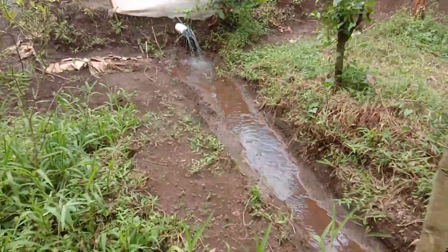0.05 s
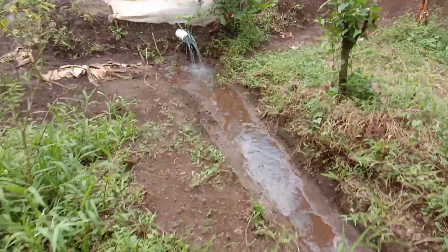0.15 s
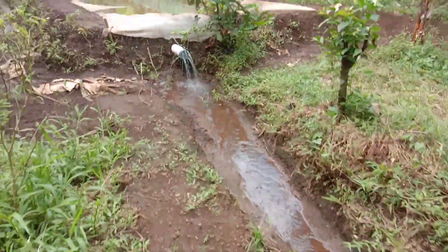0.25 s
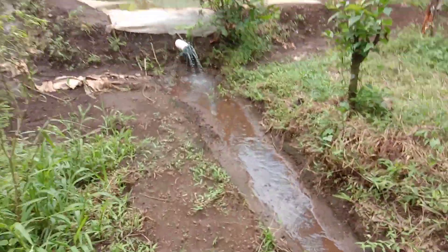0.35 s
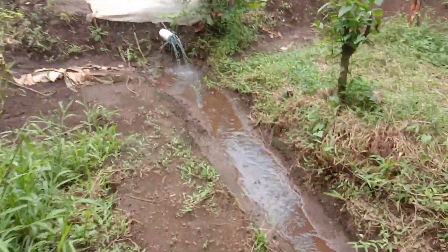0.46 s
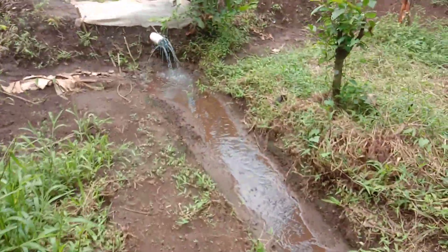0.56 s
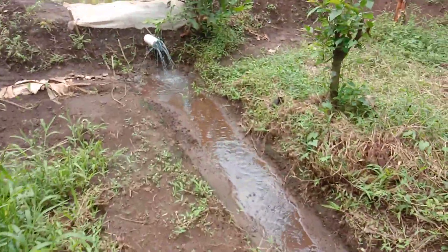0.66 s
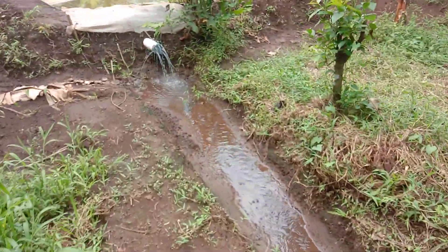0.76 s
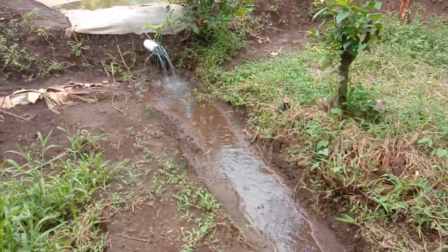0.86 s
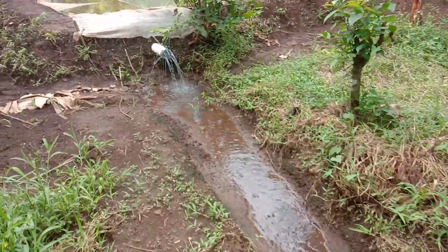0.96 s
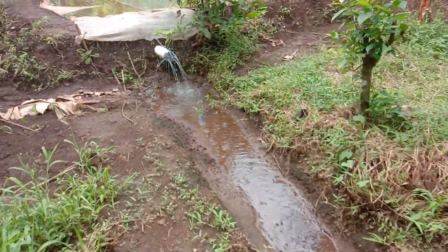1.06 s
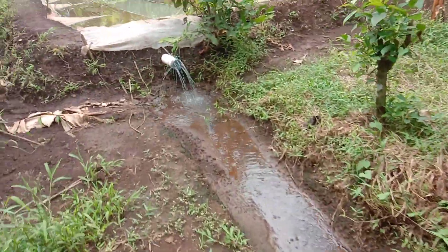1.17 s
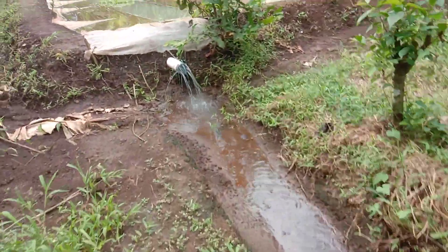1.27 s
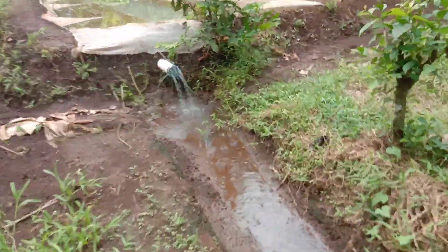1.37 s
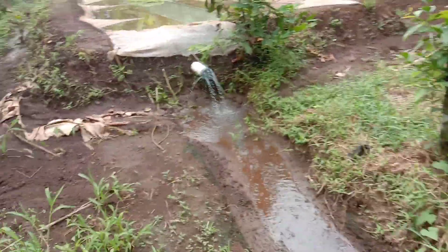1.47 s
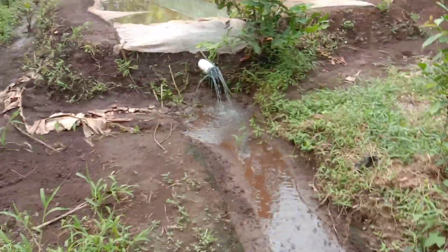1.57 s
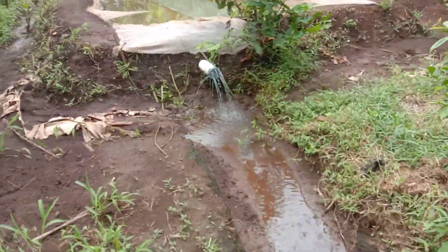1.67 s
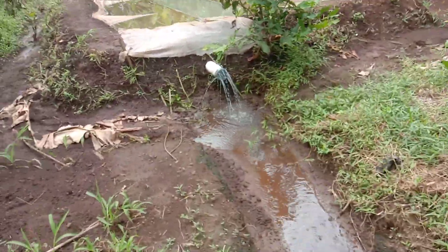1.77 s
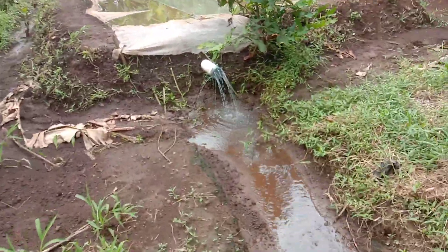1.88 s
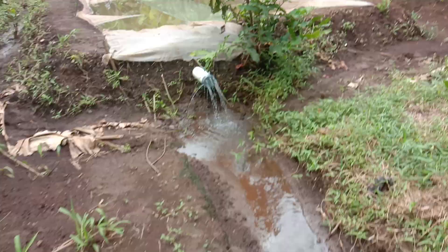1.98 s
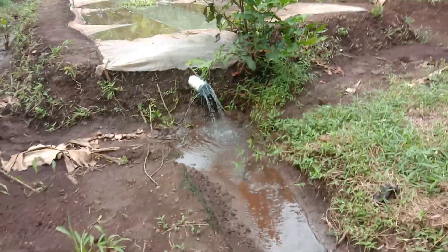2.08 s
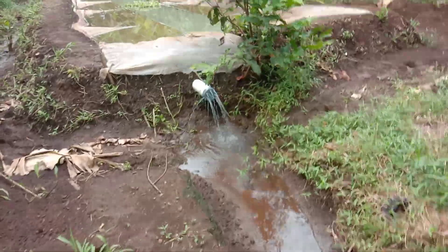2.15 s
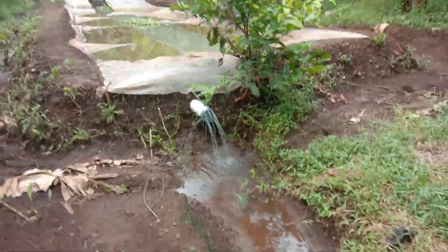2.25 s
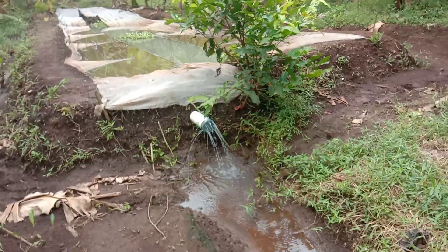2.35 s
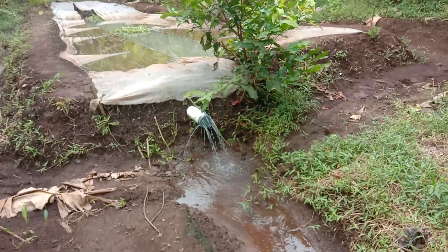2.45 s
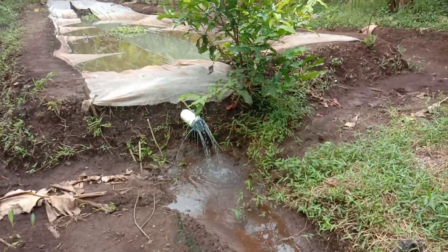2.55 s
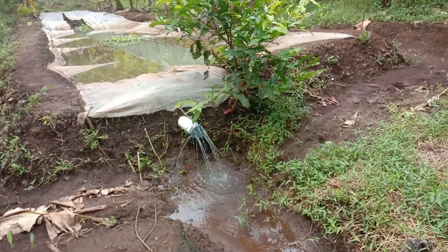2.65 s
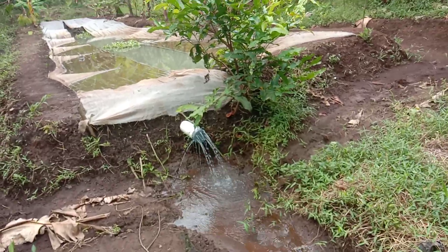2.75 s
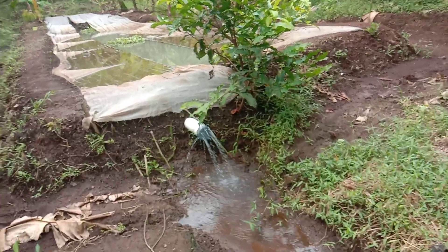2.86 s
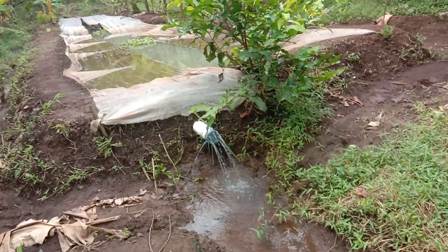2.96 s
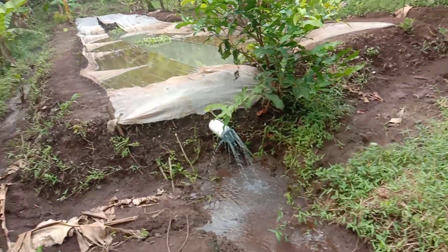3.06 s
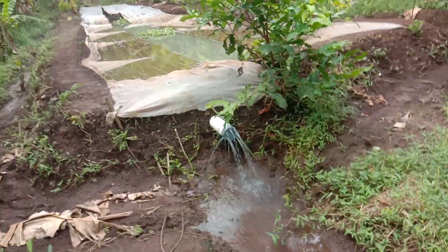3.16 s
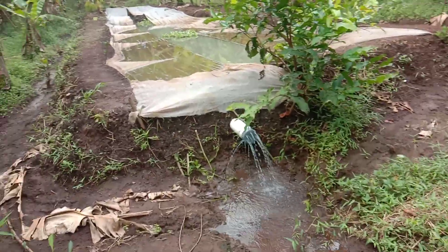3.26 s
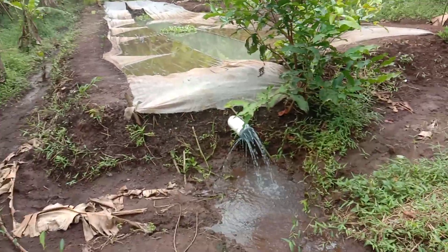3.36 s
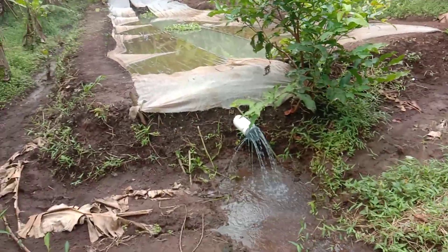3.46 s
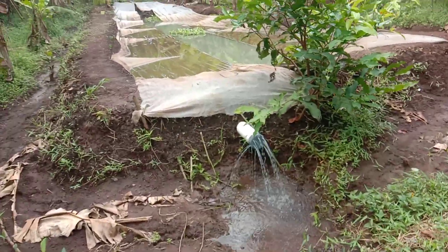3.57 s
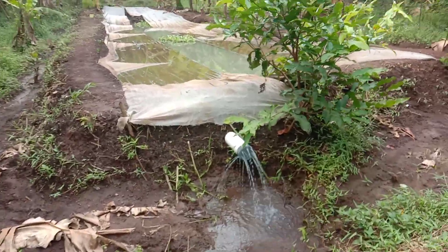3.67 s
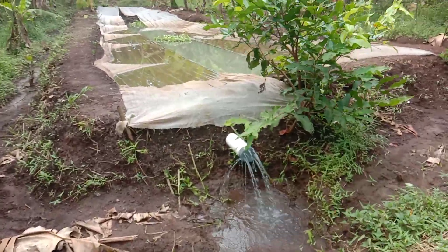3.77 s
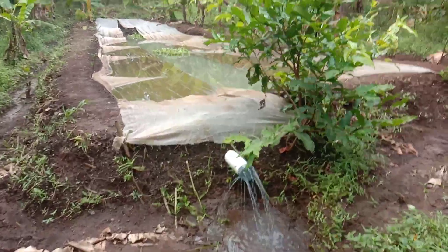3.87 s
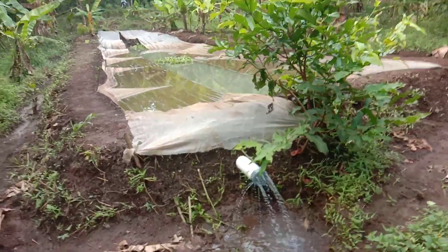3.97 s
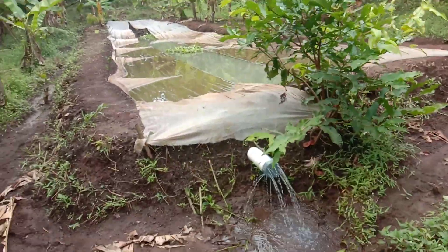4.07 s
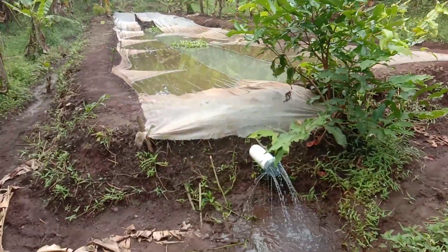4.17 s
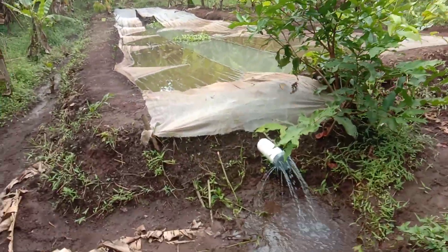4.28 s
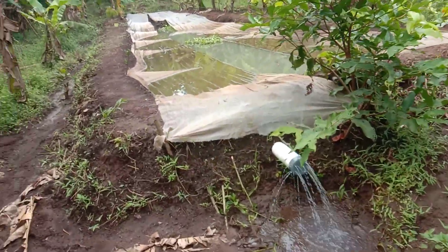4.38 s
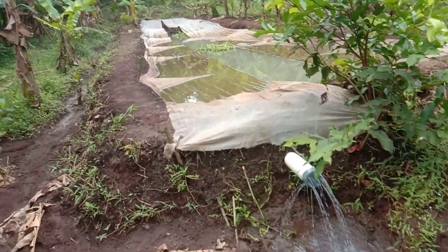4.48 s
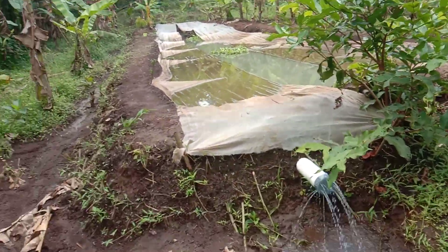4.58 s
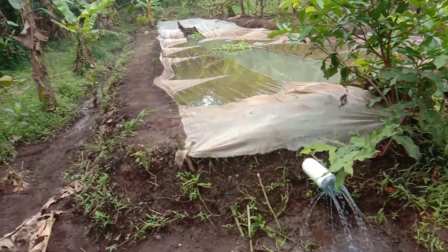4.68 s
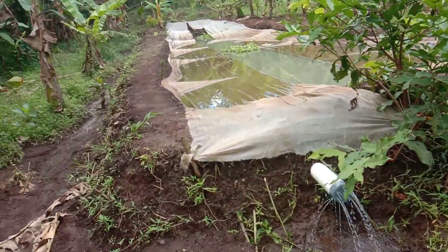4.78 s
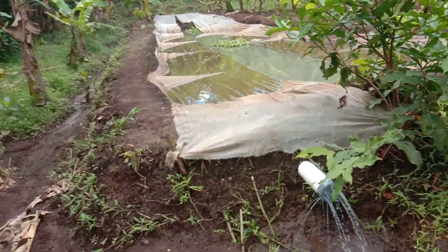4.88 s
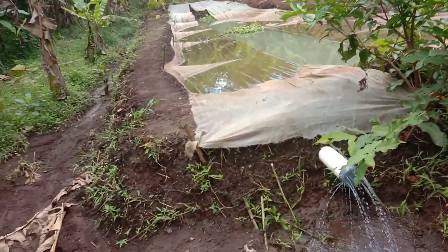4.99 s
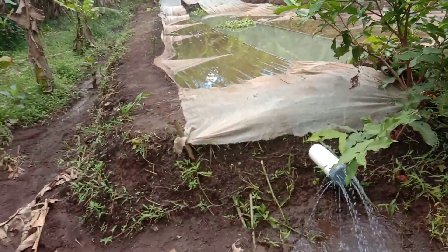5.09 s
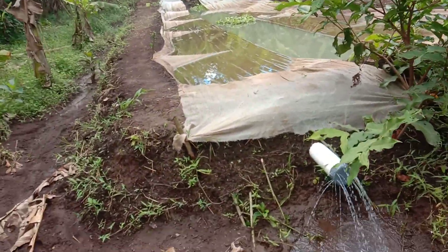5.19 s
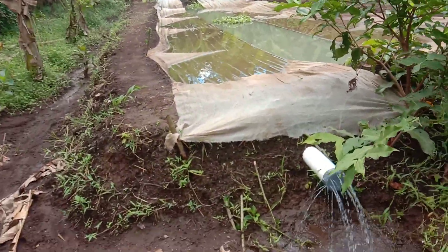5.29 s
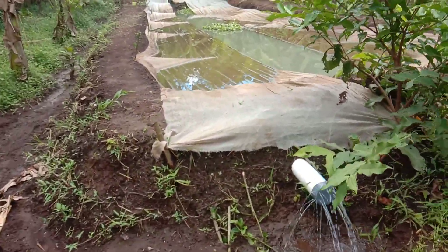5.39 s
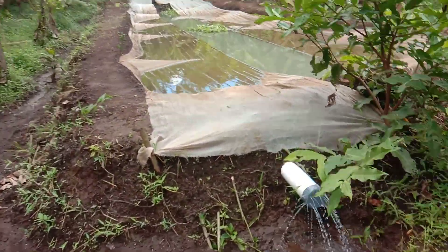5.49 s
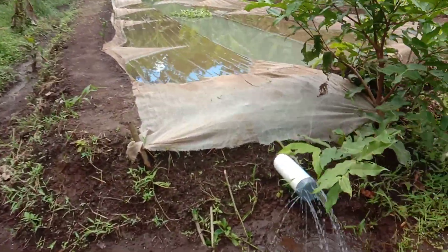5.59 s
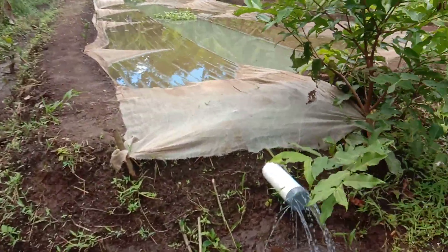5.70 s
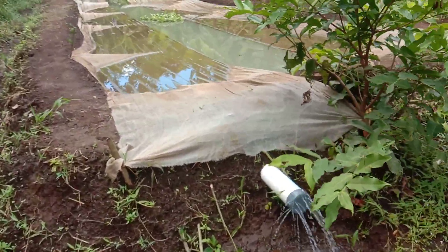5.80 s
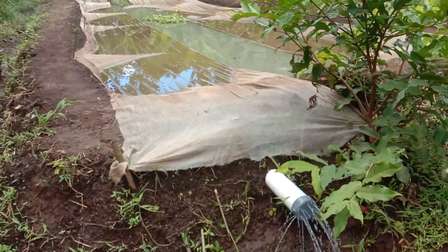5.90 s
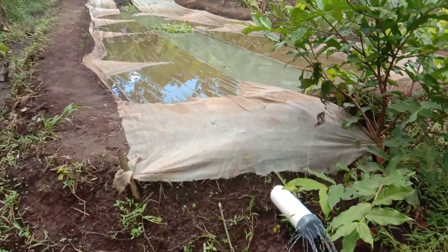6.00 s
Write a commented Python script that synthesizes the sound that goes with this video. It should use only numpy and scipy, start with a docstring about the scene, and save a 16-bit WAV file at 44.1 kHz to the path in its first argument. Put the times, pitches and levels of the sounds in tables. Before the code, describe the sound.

Water pours steadily from a plastic pipe into a muddy puddle, splashing and plinking louder as the listener walks closer, engines droning faintly far off.

```python
"""A broad wash of noise opens, swelling quickly and ebbing, as water pours from a plastic pipe into a muddy puddle.
Clumped drops patter, bubbles and the pipe's mouth ring, and two small engines drone far off over a rumble.
Plops stand out from the start, and then slaps and gushes; the engines speed up and slacken.
As the microphone walks up, the splashing grows as 1 / distance and the plinks ring clearer; later, dull thuds join.
Water is random impacts, filtered noise and decaying bubble tones; engines are harmonic sums."""
import sys
import numpy as np
from scipy import signal
from scipy.fft import rfft, irfft, next_fast_len
from scipy.io import wavfile
from scipy.ndimage import map_coordinates

SR = 44100
rng = np.random.default_rng(int(sys.argv[2]) if len(sys.argv) > 2 else 0)


def wav_record(signal):
    """Record a signal, one row per channel, as 16-bit PCM in the file named by sys.argv[1]."""
    frames = np.transpose(np.atleast_2d(signal))
    bounded = np.clip(frames, -1, 1)
    # unit amplitude maps onto the largest positive 16-bit level
    quanta = np.round(bounded * 32767).astype(np.int16)
    wavfile.write(sys.argv[1], SR, quanta)


N = 266099  # length in samples

# The walk up to the puddle: start_s, distance_m
APPROACH = [(0, 2.45), (.6, 2.8), (2, 2.5), (3.3, 2.34), (4.2, 1.89), (5.6, 1.4), (6.03, 1.55)]
# Rises and dips of the pipe's flow: start_s, lift_db, length_s
GUSHES = [(1.632, 9, 0.046), (1.837, 4.5, 0.16), (3.49, 2.5, 0.32), (3.785, 3.5, 0.13), (4.85, -1, 0.13),
          (5.867, 0.5, 0.059)]
GUSH_RISE = 0.17  # share of its length that a gush takes to build up
SPATTER_DB = -35  # reference at 1 m, before gushes and each layer's own gain
# Spectrum of the spatter: frequency_hz, gain_db
SPATTER = [(150, -9.5), (450, -11.5), (750, -12.5), (1000, 1), (1250, -5), (1600, -3), (2800, 4.5),
           (3600, 0.5), (4400, 3.5), (5200, 0), (7400, 0), (8300, -7), (11000, -12.5), (15200, -9)]
# Spectrum of the fine spray: frequency_hz, gain_db
SPRAY = [(3000, -14.5), (7000, 4.5), (9000, -2), (11500, 4.5), (13600, -9), (15200, -7.5)]
# Fine spray, and trickle of like-sized bubbles before a fixed cut: start_s, spray_db, trickle_db
MIST = [(0, -17, -26), (.7, -9.5, -35), (2.8, -12, -0.5), (3.6, -11, -1), (4.5, -10.5, -3), (5.5, -13.5, 0),
        (6.03, -5, 1.5)]
# Fixed resonances that colour the splashing: centre_hz, width_hz, lift_db
RESONANCES = [(1255, 115, 5.5), (2330, 330, 2), (5950, 450, 3.5), (6300, 300, 6.5), (6570, 220, -5),
              (7250, 700, 4.5), (13850, 600, -4), (14700, 700, 11), (15350, 650, 10)]
# Gurgle of air dragged under by the jet: start_s, level_db
CHURN = [(0, -60.5), (.45, -50), (.68, -55.5), (.8, -62), (.98, -53.5), (1.1, -53), (1.6, -53.5),
         (2.3, -50), (2.9, -52.5), (3.5, -50), (3.85, -49.5), (3.95, -56), (4.3, -52.5), (5.3, -47.5),
         (6.03, -51.5)]
GLUG_DB = -10.5  # against the gurgle
# Hollow resonances of the pipe's mouth: centre_hz, width_hz, level_db
PIPE_MODES = [(1244, 53, 0), (1296, 61, 0.5)]
# Level of the pipe's ring: start_s, level_db
PIPE_DB = [(0, -59), (.5, -49), (.8, -55.5), (1.3, -55.5), (2.6, -53), (3.7, -55.5), (4.4, -53.5),
           (6.03, -48.5)]
PLINK_DB = -3  # against the splashing reference at 1 m
PLINK_GROWTH_DB = 3.5  # gained on the splashing with each halving of the distance
# The opening wash: start, level, swell and ebb
WASH_S, WASH_DB, WASH_RISE_S, WASH_T60_S = 0.033, -36.5, 0.062, 1.42
# Spectrum of the opening wash: frequency_hz, gain_db
WASH = [(200, -32), (400, -8.5), (700, 2), (1000, -9), (1400, 2), (2200, 1), (4200, 4.5), (6500, 3.5),
        (8500, -13), (12000, -4), (15000, -10)]
# Lumps of water: start_s, starting_db, t60_s, centre_hz
SPLASHES = [(1.162, -36.5, 0.18, 1800), (1.168, -45, 0.6, 3640), (3.058, -49, 0.12, 1600),
            (3.608, -41, 0.16, 3820), (4.503, -25.5, 0.043, 5050), (4.81, -43, 0.38, 2350),
            (4.899, -43, 0.17, 2620), (4.924, -38, 0.077, 3350), (5.152, -29.5, 0.048, 5700),
            (5.889, -45, 0.27, 2600)]
# Large bubbles, before their tail: start_s, ring_peak_db, pitch_hz, splash_against_ring_db
PLOPS = [(.005, -44.5, 796, -11), (0.058, -35, 1890, 0), (.108, -31, 4100, 0), (.12, -38.5, 1430, -4),
         (0.194, -38, 1120, 3), (0.319, -41, 1270, -1), (0.982, -32, 2120, -10), (1.079, -42, 1015, 2),
         (1.162, -27, 1357, -11), (1.19, -31.5, 2040, -6), (1.24, -37, 1260, -10), (1.254, -31.5, 3530, -6),
         (1.377, -29, 2860, -3), (1.385, -40.5, 1030, 1), (1.41, -39.5, 857, -5), (1.486, -37.5, 1260, -17),
         (1.788, -33.5, 2760, 1), (1.807, -32, 2980, 1), (2.335, -34.5, 1230, -17),
         (2.396, -33.5, 3300, -5), (2.72, -34.5, 2600, 2), (2.757, -36, 2500, -14), (2.828, -33, 2490, -12),
         (2.883, -29, 2430, -7), (2.974, -27.5, 2420, -11), (3.06, -33.5, 1340, -1), (3.14, -28, 3600, -4),
         (3.172, -31.5, 3270, -1), (3.241, -34, 4040, 2), (3.319, -31.5, 2300, -6), (3.383, -37, 1020, 1),
         (3.441, -25, 2140, -12), (3.448, -31, 1950, -12), (3.521, -32, 2510, -14), (3.527, -34, 1280, -14),
         (3.538, -30.5, 2310, -6), (3.61, -31, 1830, -6), (3.616, -29.5, 2430, -6), (3.865, -32, 2340, -11),
         (4.039, -27, 2690, -28), (4.042, -34, 1140, -3), (4.115, -34.5, 1260, -17),
         (4.224, -35, 2430, -15), (4.245, -27.5, 2320, -11), (4.288, -32.5, 2290, -8),
         (4.366, -32.5, 2390, -2), (4.376, -34, 1230, -10), (4.473, -30, 2460, -14),
         (4.629, -30.5, 4300, 6), (4.825, -32.5, 1250, -20), (4.835, -33.5, 2220, 1.5),
         (4.864, -41, 1480, 3), (4.885, -25, 2250, -18), (4.907, -31, 2270, -8), (4.927, -25.5, 2350, -1),
         (4.934, -34, 2380, -13), (5.23, -36, 1430, -15), (5.25, -29.5, 2950, -9), (5.267, -28, 4250, -11),
         (5.363, -34.5, 980, -10), (5.462, -33, 1270, -27), (5.524, -27.5, 3000, 1), (5.538, -27, 4330, -4),
         (5.692, -29, 3270, 4.5), (5.715, -35, 1080, -10), (5.767, -33, 4300, 5), (5.891, -25, 2500, -10),
         (5.899, -30.5, 1290, -15), (5.917, -23, 2880, -1), (5.944, -27, 3380, -6), (5.955, -24, 4080, -5),
         (5.993, -29.5, 2560, -10)]
SPLASH_T60_S = 0.084
# Bubbles that glide upward, before their envelope: start_s, level_db, length_s, first_hz, last_hz
BLOOPS = [(0.127, -39, .022, 566, 800), (0.642, -38, 0.033, 605, 866), (1.586, -36, 0.027, 700, 870),
          (2.508, -30.5, 0.025, 677, 1426), (3.184, -34, 0.0203, 780, 870), (3.261, -28, 0.031, 856, 1436),
          (3.58, -29.5, 0.025, 785, 1560), (3.765, -39.5, 0.033, 622, 880), (3.804, -34, 0.053, 698, 1140),
          (4.57, -37, .03, 680, 1165), (4.718, -30.5, 0.037, 834, 1245), (5.149, -37.5, 0.021, 415, 515),
          (5.584, -32, 0.034, 840, 1235), (5.872, -33.5, 0.024, 475, 744)]
# Drops slapping on wet mud, before their tail: start_s, peak_db, centre_hz, half_width_octaves
SLAPS = [(1.275, -28, 5670, 0.16), (2.884, -28, 4600, 0.96), (3.61, -38, 5200, 0.72),
         (3.663, -22, 4577, 0.48), (3.68, -17, 4370, 0.67), (3.822, -22, 5460, 0.48),
         (4.15, -24.5, 7200, 0.17), (4.246, -23.5, 5800, 0.37), (4.413, -30, 6400, .3),
         (4.502, -25, 5320, 0.56), (4.549, -21, 5200, 0.51), (4.679, -23.5, 5940, 0.35),
         (4.9455, -16.5, 6830, 0.12), (5.042, -22, 5900, 0.32), (5.153, -28, 5200, 0.59),
         (5.397, -21, 6400, 0.24)]
CRACK_T60_S = 0.011
# Flung droplets, before resonance and tail: start_s, peak_db
TICKS = [(1.164, -28), (1.645, -38), (2.884, -35), (4.005, -27), (4.3, -32), (4.559, -22.5), (4.568, -31),
         (5.152, -35), (5.579, -23), (5.793, -22.5), (5.927, -25)]
TICK_HZ, TICK_T60_S = 11300, 0.011
# Dull low thuds: start_s, peak_db, length_s, pitch_hz
THUDS = [(3.591, -38.5, 0.12, 86), (3.68, -36, 0.093, 86), (4.56, -41, 0.065, 88), (4.58, -44, 0.055, 208),
         (4.682, -42, 0.09, 92), (4.74, -40, 0.029, 187), (4.788, -38, 0.053, 93), (4.85, -44, 0.062, 209),
         (5.324, -40, 0.078, 93), (5.412, -42, 0.069, 86), (5.429, -45, 0.041, 211)]
# Speed of the larger engine: start_s, firing_rate_hz
REVVING_HZ = [(0, 30.6), (.3, 29.4), (.55, 30), (.75, 28.8), (1.35, 27.7), (1.57, 25), (1.8, 25.9),
              (2.22, 27.4), (2.4, 26.7), (3, 29.8), (3.2, 29.9), (3.52, 31.2), (3.62, 28), (3.75, 27.6),
              (3.86, 24.3), (4.42, 20), (4.75, 23.8), (4.97, 24.9), (5.7, 22), (6.03, 21.7)]
# Loudness of the larger engine: start_s, level_db
REVVING_DB = [(0, -51), (.75, -48.5), (1.35, -45.5), (1.8, -46), (2.25, -42), (2.7, -46), (3, -45.5),
              (3.5, -48), (3.68, -45), (3.9, -49), (4.1, -57), (4.42, -65), (4.55, -52.5), (4.97, -45),
              (5.15, -52), (5.35, -48.5), (6.03, -50)]
# Exhaust partials of the larger engine: multiple_of_firing_rate, level_db
REVVING_ORDERS = [(2, -22), (3, -25), (4, 7.5), (5, 2.5), (6, -2.5), (7, -13.5), (8, -12)]
# Speed of the smaller engine: start_s, firing_rate_hz
SMALL_HZ = [(0, 69), (.55, 73), (.8, 71.2), (1.43, 70.8), (3.75, 63), (4, 74.5), (4.28, 82.5), (5, 71),
            (6.03, 66)]
# Sound of the smaller engine: start_s, level_db, octave_against_fundamental_db
SMALL_DB = [(0, -57.5, 2), (.55, -49, -8), (.8, -38, 10), (.98, -52, 0), (1.43, -44, 15), (1.6, -64, 0),
            (3.75, -58, 2), (4, -49.5, -3), (4.28, -50, -4), (4.42, -64, 6), (5, -51, -7), (6.03, -63, 3)]
# Level of the distant rumble: start_s, deep_db, growl_db
RUMBLE_DB = [(0, -51.5, -57.5), (1, -53, -67), (1.35, -49.5, -52.5), (2.1, -56, -52.5), (2.75, -55, -61.5),
             (3.5, -59, -48.5), (3.8, -55, -65), (4.25, -60, -53), (4.4, -64, -52), (4.9, -48, -57.5),
             (5.2, -57, -59), (6.03, -54, -58)]
# Spectrum of the deep part: frequency_hz, gain_db
RUMBLE = [(20, -22), (40, -36), (60, -14), (85, -1.5), (140, -3), (200, -14), (300, -29), (1000, -57)]
# Spectrum of the upper growl: frequency_hz, gain_db
GROWL = [(90, -7.5), (160, 2.5), (215, 3), (270, -6.5), (340, -7), (450, -24.5), (1200, -26)]
TOP_HZ = 15620  # upper band limit


def jet():
    """Impact noise and bubble resonance: spatter and spray surge in clumps over gurgling and fizzing bubbles."""
    spatter_db = jet_level()
    spray_db, trickle_db = curves(MIST)
    churn_db, = curves(CHURN)

    surge = clumps(rate=82, life=0.01, spread_db=-0.5, steady=0.99)
    spatter = tinted(surge * patter(rate=1700, spread_db=7.5, hiss_db=-11.0), SPATTER)
    flung = clumps(rate=170, life=0.0063, spread_db=12.0, steady=1.0)
    mist = unit(np.sqrt(surge) * flung * patter(rate=660, spread_db=0.0, hiss_db=-1.0))
    spray = tinted(mist, SPRAY)

    gurgle = bubbles(count=3400, centre_hz=1495, octaves=0.541, cycles=4.7, spread_db=4.5, size=700)
    trickle = bubbles(count=420, centre_hz=2320, octaves=0.09, cycles=5.4, spread_db=2.0, size=600)
    fizz = bubbles(count=8000, centre_hz=4400, octaves=0.45, cycles=3, spread_db=5.5, size=300)

    surface = amp(-1.5) * in_puddle(spatter) + amp(-7.5) * in_puddle(fizz)
    near = amp(spray_db) * unit(resonant(spray)) + amp(trickle_db - 8.5) * in_puddle(trickle)
    return amp(spatter_db) * (surface + near) + amp(churn_db) * in_puddle(gurgle)


def jet_level():
    """Spherical spreading: the splashing grows as 1 / distance and follows each gush, in dB."""
    gush_db = sum(db * swell(s, length, GUSH_RISE) for s, db, length in GUSHES)
    distance_m, = curves(APPROACH)
    return SPATTER_DB - 20 * np.log10(distance_m) + gush_db


def in_puddle(x):
    """Scattering and resonance: the surroundings smear and colour a splashing sound, set to rms 1."""
    return unit(resonant(scattered(x, t60=0.058, wet_db=1.5)))


def pipe():
    """Driven resonance: the falling water keeps the pipe's mouth ringing in short, uneven notes."""
    lumps = clumps(rate=29, life=0.0072, spread_db=1, steady=0.15)
    drive = lumps * patter(rate=500, spread_db=5, hiss_db=-8)
    ring = np.zeros(N)
    for hz, width, db in PIPE_MODES:
        band = [hz - width / 2, hz + width / 2]
        mode = signal.butter(2, band, "band", fs=SR, output="sos")
        ring += amp(db) * unit(signal.sosfilt(mode, drive))
    return amp(curves(PIPE_DB)[0]) * unit(ring)


def plinks():
    """Bubble resonance: drops beside the jet trap small bubbles that, when nearer, ring clear of the hiss."""
    swarm = bubbles(count=1600, centre_hz=5310, octaves=0.384, cycles=5.4, spread_db=3.0, size=500)
    near_db = -PLINK_GROWTH_DB * np.log2(curves(APPROACH)[0])
    heard = unit(resonant(scattered(swarm, t60=0.035, wet_db=-2.5)))
    return amp(jet_level() + PLINK_DB + near_db) * heard


def wash():
    """Enveloped broadband noise: a broad wash of noise swells quickly and ebbs."""
    t = np.maximum(np.arange(N) / SR - WASH_S, 0)
    envelope = np.minimum(t / WASH_RISE_S, 1) * amp(WASH_DB - 60 * t / WASH_T60_S)
    hiss = tinted(patter(rate=2500, spread_db=9.0, hiss_db=0.5), WASH)
    return envelope * unit(hiss)


def glugs():
    """Low bubble resonance: big bubbles murmur in the churned puddle."""
    swarm = bubbles(count=200, centre_hz=703, octaves=0.378, cycles=4, spread_db=1, size=1400)
    return amp(curves(CHURN)[0] + GLUG_DB) * unit(scattered(swarm, t60=0.15, wet_db=-3.5))


def splashes():
    """Decaying impact noise: a whole lump of water lands and rains back in droplets."""
    out, t = np.zeros(N), np.arange(SR // 4) / SR
    for s, db, t60, hz in SPLASHES:
        add(out, s, amp(db) * splash(t, hz, t60, octaves=0.41))
    return out


def plops():
    """Cavity closure: larger pockets of air close with a splash and ring briefly."""
    out, t = np.zeros(N), np.arange(SR // 10) / SR
    for s, db, hz, splash_db in PLOPS:
        ring = peaked(bubble(t, hz, cycles=5.4, rise=0.0033, onset=0.64))
        burst = peaked(splash(t, 1.16 * hz, SPLASH_T60_S, octaves=0.45))
        add(out, s, amp(db) * (ring + amp(splash_db) * burst))
    return scattered(out, t60=0.2, wet_db=-9)


def bloops():
    """Rising bubble resonance: a big bubble nears the surface, wobbling up in pitch and louder, then fading."""
    out = np.zeros(N)
    for s, db, length, from_hz, to_hz in BLOOPS:
        u = np.linspace(0, 1, int(length * SR))
        turns = np.cumsum(from_hz * (to_hz / from_hz) ** u) / SR
        knots = np.clip(rng.standard_normal(10), -1.5, 1.5)
        flutter = np.interp(u, np.linspace(0, 1, 10), knots)
        # the same flutter, reversed in time, disturbs the phase
        ring = amp(3 * flutter) * np.sin(2 * np.pi * (turns + 0.15 * flutter[::-1]))
        envelope = np.interp(u, [0, 0.35, 0.62, 1], [0.082, 0.095, 0.33, 0.18])
        add(out, s, amp(db) * envelope * ring)
    return scattered(out, t60=0.15, wet_db=-6.5)


def slaps():
    """Short impacts: drops crack on wet mud, broad and dry or narrow and pinging; the smallest burst into spray."""
    out, spray, t = np.zeros(N), np.zeros(N), np.arange(SR // 20) / SR
    for s, db, hz, octaves in SLAPS:
        add(out, s, amp(db) * peaked(splash(t, hz, CRACK_T60_S, octaves)))
    for s, db in TICKS:
        add(spray, s, amp(db) * peaked(splash(t, TICK_HZ, TICK_T60_S, octaves=1.0)))
    return scattered(out + resonant(spray), t60=0.13, wet_db=-14)


def thuds():
    """Enveloped tones: dull, uneven bumps in the bass, each a few wavering cycles long."""
    out = np.zeros(N)
    for s, db, length, hz in THUDS:
        u = np.linspace(0, 1, int(length * SR))
        waver = np.interp(u, np.linspace(0, 1, 6), rng.standard_normal(6))
        envelope = np.interp(u, [0, 0.3, 0.65, 1], [0.11, 0.99, 0.78, 0.082])
        add(out, s, amp(db) * envelope * np.sin(2 * np.pi * (hz * length * u + 0.092 * waver)))
    return out


def traffic():
    """Superposition: two distant engines sound over a diffuse low rumble."""
    deep_db, growl_db = curves(RUMBLE_DB)
    small_db, octave_db = curves(SMALL_DB)
    diffuse = rumble(deep_db, RUMBLE, lumps_db=2.5) + rumble(growl_db, GROWL, lumps_db=3.0)
    revving = engine(curves(REVVING_HZ)[0], curves(REVVING_DB)[0], REVVING_ORDERS)
    small = engine(curves(SMALL_HZ)[0], small_db, [(1, 0), (2, octave_db)])
    return diffuse + revving + small


def engine(rate_hz, level_db, orders):
    """Harmonic series: exhaust partials line up in one puff per firing, and the puffs vary in strength."""
    turns = np.cumsum(rate_hz * (1 + 0.006 * wobble(7))) / SR
    knots = np.clip(rng.standard_normal(N // 100), -1.5, 1.5)
    puff_db = 2 * map_coordinates(knots, [turns], order=1)  # one knot per firing
    drone = np.zeros(N)
    for k, db in orders:
        level = amp(db + 2.5 * wobble(7))
        drone += level * np.cos(2 * np.pi * (round(k) * turns + 0.02 * wobble(12)))
    strength = np.sqrt(sum(amp(db) ** 2 for k, db in orders))
    return amp(level_db) * unit(drone / strength * amp(puff_db))


def rumble(level_db, spectrum, lumps_db):
    """Modulated noise: a low rumble arrives in uneven lumps."""
    lumpy = amp(lumps_db * wobble(20)) * rng.standard_normal(N)
    return amp(level_db) * unit(tinted(lumpy, spectrum))


def clumps(rate, life, spread_db, steady):
    """Random arrivals with exponential decay: each lump lands at once and drains away."""
    sizes = amp(spread_db * np.clip(rng.standard_normal(N), -2, 2)) ** 2
    landed = (rng.random(N) < rate / SR) * sizes
    power = signal.lfilter([1], [1, -np.exp(-1 / (life * SR))], landed)
    return unit(np.sqrt(power / power.mean() + steady))


def patter(rate, spread_db, hiss_db):
    """Shot noise: tiny impacts of very unequal size on a bed of hiss."""
    struck = rng.random(N) < rate / SR
    sizes = amp(spread_db * np.clip(rng.standard_normal(N), -3, 2.5))
    clicks = struck * rng.choice([-1, 1], N) * sizes
    return unit(unit(clicks) + amp(hiss_db) * rng.standard_normal(N))


def bubble(t, hz, cycles, rise, onset=0.33):
    """Damped oscillation: a trapped bubble swells and rings, rising in pitch as it nears the surface."""
    age = t * hz / cycles  # in decay times
    envelope = np.exp(-age) * (1 - np.exp(-t * hz / onset))
    return envelope * np.sin(2 * np.pi * hz * t * (1 + rise * np.minimum(age, 4) / 2))


def bubbles(count, centre_hz, octaves, cycles, spread_db, size):
    """Sum of damped oscillators: bubbles of random pitch and strength, each size samples long, at rms 1."""
    pitch, strength, life = np.clip(rng.standard_normal((count, 3)), -2.4, 2.4).T
    start = rng.integers(0, N, count)
    hz = np.minimum(centre_hz * 2 ** (octaves * pitch), SR / 3)[:, None]
    t = np.arange(size) / SR
    # the same energy in a larger bubble is spread over a longer, softer ring
    strengths = np.sqrt(hz) * amp(spread_db * np.minimum(strength, 1.6))[:, None]
    rings = strengths * bubble(t, hz, cycles * np.exp(0.74 * life)[:, None], rise=0.055)
    faded = rings * (1 - t / t[-1])
    where = start[:, None] + np.arange(size)
    return unit(np.bincount(where.ravel(), faded.ravel(), N)[:N])


def splash(t, hz, t60, octaves):
    """Band-limited decaying noise: a ragged burst of tiny impacts around hz, before decay at rms 1."""
    edges = np.clip([hz / 2 ** octaves, hz * 2 ** octaves], 100, SR * 0.45)
    sizes = amp(6 * np.clip(rng.standard_normal(len(t)), -2, 2))
    grains = rng.standard_normal(len(t)) * sizes
    b, a = signal.butter(2, edges, "band", fs=SR)
    return unit(signal.lfilter(b, a, grains)) * amp(-60 * t / t60)


def scattered(x, t60, wet_db, size=1024):
    """Diffuse reflection: rippling water and the banks add a short tail that changes from moment to moment."""
    t = np.arange(4 * size) / SR
    pieces = np.pad(x, (0, -N % size)).reshape(-1, size)
    envelope = amp(-60 * t / t60) * (1 - np.exp(-t / 0.00046))
    tails = rng.standard_normal((len(pieces), len(t))) * envelope
    tails /= np.linalg.norm(tails, axis=1, keepdims=True)
    answers = signal.fftconvolve(pieces, tails, axes=1)
    # overlap-add every piece's own tail
    where = size * np.arange(len(pieces))[:, None] + np.arange(answers.shape[1])
    return x + amp(wet_db) * np.bincount(where.ravel(), answers.ravel())[:N]


def resonant(x):
    """Resonance: fixed peaks and dips colour x."""
    def lift_db(hz):
        return sum(db / (1 + (2 * (hz - centre) / width) ** 2) for centre, width, db in RESONANCES)
    return shaped(x, lift_db)


def tinted(x, points):
    """Spectral shaping: colour x by (frequency_hz, gain_db) points on a log axis."""
    f, db = np.transpose(points)
    return shaped(x, lambda hz: np.interp(np.log(hz + 1), np.log(f), db))


def shaped(x, gain_db):
    """Causality: a minimum-phase filter, built from the cepstrum, with the given dB gain over frequency."""
    size = 2 * next_fast_len(N // 2 + SR // 4)
    cepstrum = irfft(np.log(amp(gain_db(np.fft.rfftfreq(size, 1 / SR)))))
    cepstrum[1:size // 2] *= 2
    cepstrum[size // 2 + 1:] = 0
    return irfft(rfft(x, size) * np.exp(rfft(cepstrum)))[:N]


def swell(s, length, rise):
    """Linear envelope: from 0 up to 1 and back; rise is the share of its length spent going up."""
    return np.interp((np.arange(N) / SR - s) / length, [0, np.clip(rise, 0.01, 0.99), 1], [0, 1, 0])


def wobble(rate):
    """Slow random modulation: a smooth curve with rate knots a second."""
    return map_coordinates(rng.standard_normal(N // 20), [np.arange(N) * rate / SR], mode="wrap")


def curves(rows):
    """Linear interpolation: one value per sample for each column after the time."""
    s, *cols = np.transpose(rows)
    return [np.interp(np.arange(N) / SR, s, c) for c in cols]


def add(track, s, sound):
    """Superposition: mix a sound into the track at s seconds."""
    start = int(np.clip(round(s * SR), 0, N))
    track[start:start + len(sound)] += sound[:N - start]


def amp(db):
    """Logarithmic level: decibels to amplitude gain."""
    return 10 ** (np.asarray(db) / 20)


def unit(x):
    """Power normalisation: scale to rms 1."""
    return x / np.sqrt(np.mean(x ** 2) + 1e-20)


def peaked(x):
    """Peak normalisation: scale to peak 1."""
    return x / np.abs(x).max()


def scene():
    """Superposition: all sources add at one microphone, which feeds both channels."""
    water = jet() + pipe() + plinks() + glugs()
    events = splashes() + plops() + bloops() + slaps()
    mono = water + wash() + events + thuds() + traffic()
    return np.array([mono, mono])


def record(dry):
    """Band limitation: the recorder keeps nothing above its upper limit."""
    size = next_fast_len(N + SR // 4)
    passed = np.fft.rfftfreq(size, 1 / SR) < TOP_HZ
    return irfft(rfft(dry, size) * passed, size)[:, :N]


dry = scene()
out = record(dry)
wav_record(out)
```